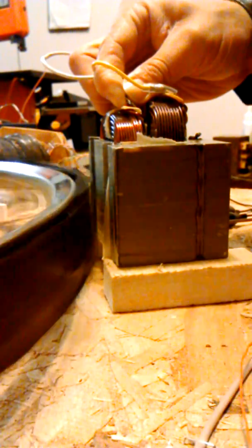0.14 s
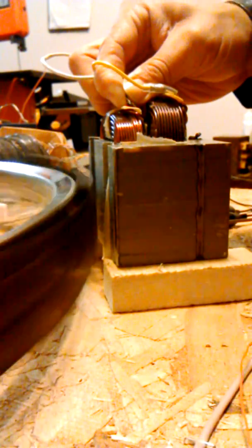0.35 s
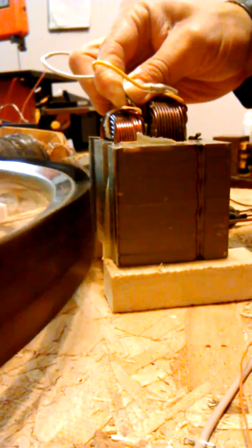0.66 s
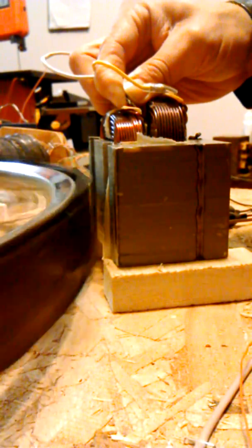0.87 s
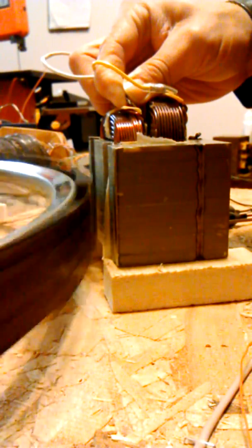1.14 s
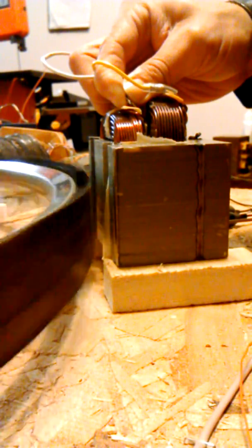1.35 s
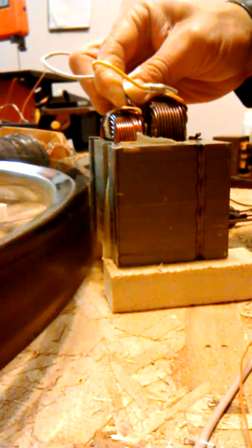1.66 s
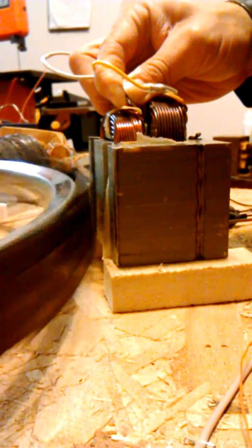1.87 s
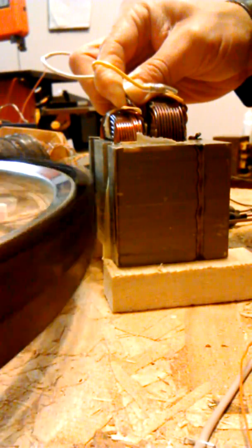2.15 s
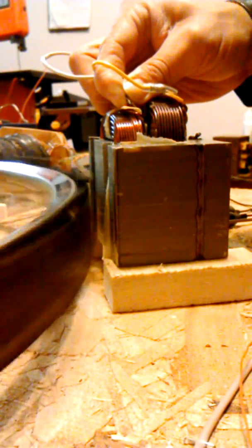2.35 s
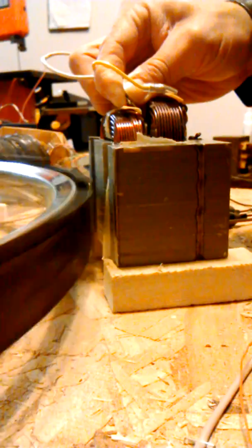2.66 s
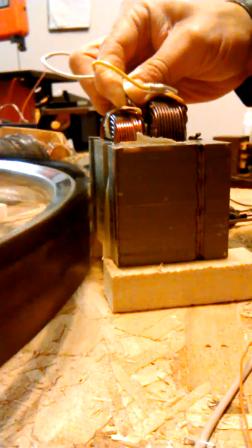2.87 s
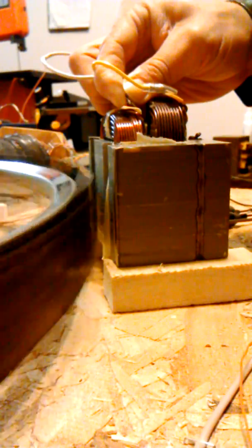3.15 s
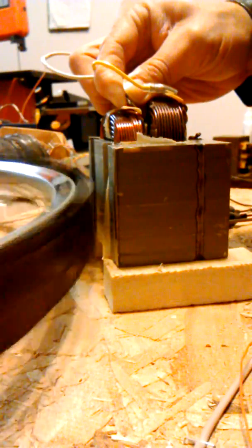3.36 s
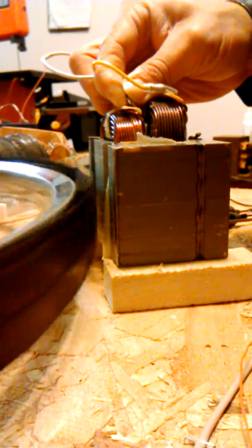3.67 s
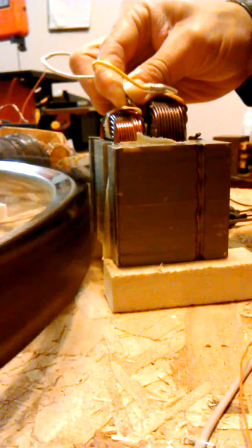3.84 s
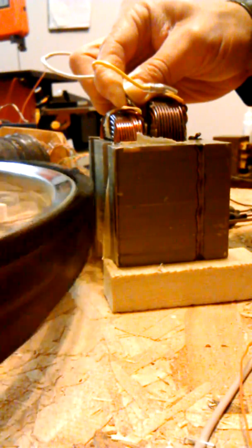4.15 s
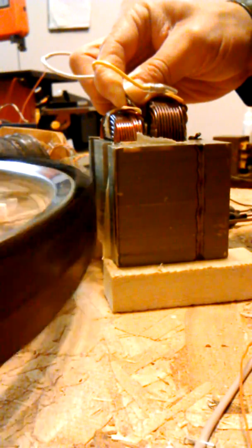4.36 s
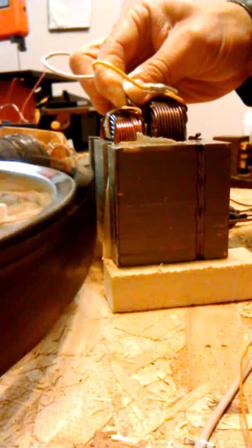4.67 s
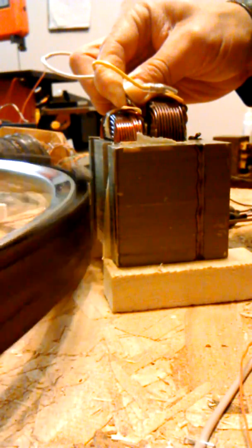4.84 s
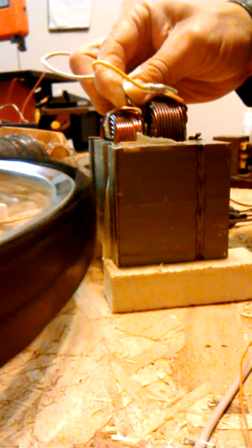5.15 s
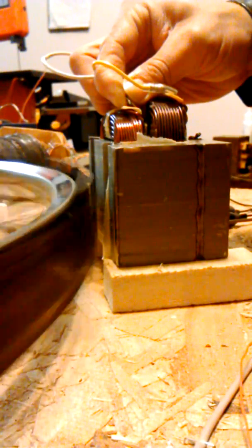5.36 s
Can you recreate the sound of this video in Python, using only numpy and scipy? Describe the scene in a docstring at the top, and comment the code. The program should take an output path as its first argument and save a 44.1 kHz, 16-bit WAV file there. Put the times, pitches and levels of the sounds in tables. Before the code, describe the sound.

Light, uneven knocks and taps from a loose part sound over the low, wavering rumble of a coasting wheel in a small workshop.

```python
"""A wheel carrying magnets coasts past hand-held, iron-cored coils on a wooden workbench.
From the start each magnet tugs at the bench and the bearing rumbles, over a faint hiss. A wire rubs,
then a loose part begins to knock unevenly, and the small workshop echoes it. Soon an iron core rings,
the board booms and wire ends click; taps, squeaks and scuffs follow. These sounds keep coming back
while the wheel slows a little."""
import sys
import numpy as np
from scipy import signal
from scipy.fft import rfft, irfft
from scipy.io import wavfile
from scipy.ndimage import uniform_filter1d

SR = 44100
rng = np.random.default_rng(int(sys.argv[2]) if len(sys.argv) > 2 else 0)


def unload_audio(sound):
    """Save the sound as a 16-bit wav file, at the path given as the first command line argument."""
    columns = np.transpose(np.atleast_2d(sound))
    # keep every value between -1 and 1, then stretch to whole-number steps
    steps = np.round(np.clip(columns, -1, 1) * 32767)
    wavfile.write(sys.argv[1], SR, steps.astype(np.int16))


N = 242991
TIME = np.arange(N) / SR

# The loose part knocks and settles into place. Hardness is how much treble a blow has.
# start_s, strength_db, hardness_db, hollow_tone_db, settle_s
KNOCKS = [(0.0588, -53.5, -7, -54.5, 0.0075), (0.1676, -44.5, -11, -50, 0.0083),
          (0.2612, -48, -3.5, -42.5, 0.0027), (0.5781, -49, -9.5, -55.5, 0.0073),
          (0.8276, -53.5, -3, -54, 0.0025), (1.1672, -58, 1.5, -52, 0.0045),
          (1.2514, -56.5, -7, -53, 0.008), (1.4018, -43.5, -25, -58, 0.0062),
          (1.557, -45.5, -11, -50.5, 0.0053), (1.7533, -46.5, -3.5, -52, 0.0087),
          (1.8853, -46.5, -1.5, -44.5, 0.0029), (2.0128, -42, 0, -43.5, 0.0083),
          (2.282, -41, -12.5, -49, 0.0041), (2.4205, -49.5, -12.5, -52.5, 0.008),
          (2.532, -53.5, -5.5, -51, 0.0046), (2.818, -42.5, -15, -51.5, 0.0076),
          (3.278, -47.5, -12, -60.5, .012), (3.325, -62, -7, -50, 0.0046), (3.374, -49, -5.5, -52, 0.0032),
          (3.4668, -47.5, -0.5, -42.5, 0.0024), (3.723, -43, 0.5, -43.5, 0.0065),
          (4.0191, -48.5, -7, -46.5, 0.0074), (4.1634, -53, -15, -48.5, 0.0058),
          (4.365, -46, 4.5, -40, 0.0049), (4.539, -54, -4, -50.5, 0.0046), (4.617, -45, -8, -53.5, 0.0109),
          (4.8765, -43.5, -12.5, -46.5, 0.0054), (5.0802, -48.5, -3.5, -45, 0.0031),
          (5.133, -46, -10.5, -50.5, 0.0084), (5.311, -48.5, -5.5, -47.5, 0.0062),
          (5.4168, -53, 1.5, -55.5, 0.0068)]
# The loose part taps without settling: start_s, strength_db, hardness_db
TAPS = [(0.383, -62.5, 9.5), (.396, -51.5, -11), (0.499, -48.5, -11.5), (0.613, -50, -15.5),
        (0.739, -48, -10), (0.928, -63, 5.5), (1.275, -46, -18), (1.426, -50.5, -5), (1.458, -51, -12),
        (1.634, -49, -13.5), (2.0169, -41, -3), (2.6, -52.5, -6), (2.676, -47.5, -4.5), (2.706, -47.5, -13),
        (2.968, -53, -7.5), (3.116, -61.5, -2.5), (3.158, -45, -15), (3.205, -50, -15), (3.505, -47.5, -11),
        (3.547, -53, -10), (3.815, -52, -8), (3.928, -51, -8), (4.009, -60, -4), (4.282, -55, -11.5),
        (4.532, -62.5, 6.5), (4.548, -49, -19), (4.707, -59, 2), (4.731, -53, -9), (4.797, -44.5, -14.5)]


def from_db(db):
    """Turn decibels into a number to multiply by."""
    return 10 ** (np.asarray(db) / 20)


def in_time(rows):
    """Join points in time with straight lines, giving one curve per column of values."""
    times, *columns = np.transpose(rows)
    return [np.interp(TIME, times, column) for column in columns]


def noise(colour):
    """Noise with a power of one. Its colour says how strong each pitch is: pitch_hz, level_db."""
    hz, db = np.transpose(colour)
    bins_hz = np.maximum(np.fft.rfftfreq(N, 1 / SR), 1)
    gain = from_db(np.interp(np.log(bins_hz), np.log(hz), db))
    shaped = irfft(rfft(rng.standard_normal(N)) * gain, N)
    return shaped / np.sqrt(np.mean(shaped ** 2) + 1e-20)


def evened(x, span_s):
    """Take the slow swells out of a noise."""
    return x / np.sqrt(uniform_filter1d(x ** 2, max(int(span_s * SR), 1)) + 1e-9)


def fade(t, ring_s):
    """Die away, falling 60 dB in ring_s seconds."""
    return np.exp(-np.log(1000) * t / ring_s)


def add(track, start_s, sound):
    """Mix a sound into the track from start_s on."""
    start = max(int(start_s * SR), 0)
    track[start:start + len(sound)] += sound[:N - start]


def ring(tones, hits, scatter_db, spread_s):
    """Start an object's own tones at each (start_s, level_db), with slightly random force and delay."""
    out = np.zeros(N)
    start_s, db = np.transpose(hits)
    chance = rng.standard_normal((len(start_s), len(tones), 2))
    for k, (hz, tone_db, ring_s) in enumerate(tones):
        hit_s = start_s + spread_s * np.abs(chance[:, k, 0])
        hit_samples = np.clip((hit_s * SR).astype(int), 0, N - 1)
        strength = from_db(db + tone_db + scatter_db * chance[:, k, 1])
        force = np.bincount(hit_samples, strength, N) * (-1) ** k
        # this filter turns each push into a fading sine wave
        decay, step = fade(1 / SR, ring_s), 2 * np.pi * hz / SR
        out += signal.lfilter([0, np.sin(step)], [1, -2 * decay * np.cos(step), decay ** 2], force + 1e-18)
    return out


def magnets(waver_db, fade_db_per_s):
    """Each passing magnet tugs the bench. The tugs waver because the magnets are not quite alike."""
    # the wheel slows: time_s, magnets_per_s
    wheel_speed = [(0, 21.56), (2.75, 20.58), (5.51, 19.5)]
    # the tones in the tug: multiple_of_passing_rate, level_db
    tug_tones = [(1, -45), (2, -58.5), (3, -56.5), (4, -62), (5, -54.5)]
    magnets_per_s, = in_time(wheel_speed)
    phase = 2 * np.pi * np.cumsum(magnets_per_s) / SR
    waver = from_db(waver_db * noise([(1, 25), (4, -4), (12, -27), (60, -100)]))
    tug = np.zeros(N)
    for multiple, db in tug_tones:
        level = from_db(db - multiple * fade_db_per_s * TIME)   # higher tones weaken faster
        tug += level * np.sin(multiple * phase + 2 * np.pi * rng.random())
    return np.sqrt(2) * waver * tug


def bearing(swell_db):
    """The rolling bearing shakes the board in random swells, over a steady drone and a thin whirr."""
    # strength of the rumble: time_s, low_db, high_db
    rumble_levels = [(0.0, -59, -58), (0.12, -52, -53), (1.99, -53, -50.5), (2.27, -54, -57),
                     (2.38, -52, -52.5), (5.19, -52.5, -55), (5.48, -64.5, -57), (5.51, -62, -49)]
    # colours of the board's low and high rumble, the drone and the whirr: pitch_hz, level_db
    board_low = [(60, -20), (88, -17.5), (102, -4), (112, -6), (122, -1.5), (136, -4), (150, -14),
                 (175, -20.5), (300, -58.5)]
    board_high = [(110, -53), (145, -5.5), (158, 0.5), (175, 3), (185, -3), (196, 3), (216, 0), (235, -15),
                  (300, -57.5), (600, -100)]
    drone = [(8, -2.5), (30, 0), (42, 0.5), (52, -1), (62, 4.5), (80, -4), (140, 1), (245, -4.5), (285, -6),
             (325, -3), (370, -10), (410, -26), (600, -26), (1500, -80)]
    whirr = [(240, -45), (400, 3), (450, 2.5), (481, 4.5), (510, -3.5), (562, -0.5), (610, -9), (690, 0.5),
             (722, 2), (760, -6.5), (801, 6.5), (825, -9), (895, -2.5), (935, 0), (990, -4.5), (1065, 5.5),
             (1130, -12.5), (1174, -12), (1215, -12), (1280, -4.5), (1450, -8.5), (1800, -8.5), (2160, -7),
             (2520, -13), (3500, -22.5), (4550, -63), (7700, -110)]
    swells = [(1, 5), (5, 1), (10, -5), (30, -47), (100, -100)]
    low_db, high_db = [db + swell_db * noise(swells) for db in in_time(rumble_levels)]
    low = from_db(low_db - 1) * evened(noise(board_low), span_s=0.061)
    high = from_db(high_db) * evened(noise(board_high), span_s=0.11)
    return low + high + from_db(-54.5) * noise(drone) + from_db(-66) * noise(whirr)


def hiss():
    """A faint, steady hiss lies behind everything."""
    # colour of the hiss: pitch_hz, level_db
    colour = [(300, -1.7), (3000, -0.09), (4300, 2), (5500, 0.11), (9000, -0.31), (11500, -1.1),
              (14000, 0.22), (16000, 0.16)]
    return from_db(-73) * noise(colour)


def wire_rubs():
    """A wire slides with a thin, short rasp."""
    # each slide: start_s, length_s, level_db
    rubs = [(0.0, 0.053, -67), (0.17, .025, -78), (0.258, 0.031, -68)]
    # colour of the rasp: pitch_hz, level_db
    colour = [(2000, -5), (3500, -7), (4400, -6), (5200, -17), (9000, -14), (15000, -38)]
    level = sum(from_db(db) * np.sin(np.pi * np.clip((TIME - start_s) / length_s, 0, 1))
                for start_s, length_s, db in rubs)
    return level * noise(colour)


def thuds(slips):
    """Knocks, taps and slips shake the wooden mount, which rings low and briefly."""
    # the mount's own tones: pitch_hz, level_db, ring_s
    wood_tones = [(482, -13, .06), (650, -5, .02), (722, -3, .04), (802, -7, .04), (895, -8, .045),
                  (935, -6, .045), (1174, -9, .05), (1280, -6, .06)]
    knocks = [(start_s, db - 0.5) for start_s, db, *_ in KNOCKS]
    taps = [(start_s, db + 7) for start_s, db, _ in TAPS]
    return from_db(-9) * ring(wood_tones, knocks + taps + slips, scatter_db=2.5, spread_s=0.0018)


def hollow_tones(start_hz, top_hz, attack_s):
    """The contact stiffens as the loose part settles, so its tone slides up through a hollow ring."""
    hollow_hz, width_hz, wall_delay_s = 1059, 45, 0.0094
    slides, t = np.zeros(N), TIME[:SR // 12]
    for start_s, _, _, db, settle_s in KNOCKS:
        tuning = 1 + 0.03 * rng.standard_normal()
        hz = (top_hz + (start_hz - top_hz) * np.exp(-t / settle_s)) * tuning
        length_s = 0.0031 + 1.05 * settle_s
        swell = (1 - np.exp(-t / attack_s)) * np.exp(-(t / length_s) ** 2)
        add(slides, start_s, from_db(db - 0.5) * swell * np.sin(2 * np.pi * np.cumsum(hz) / SR))
    hollow = signal.iirpeak(hollow_hz, hollow_hz / width_hz, fs=SR)
    tone = slides + from_db(10.5) * signal.lfilter(*hollow, slides + 1e-18)
    wall_echo = from_db(-15) * np.interp(TIME - wall_delay_s, TIME, tone)
    return tone + wall_echo


def clacks(slips):
    """Hard hits and slips make the loose part clack and set the wheel's rim singing."""
    # the own tones of the loose part and of the rim: pitch_hz, level_db, ring_s
    part_tones = [(580, -4.5, 0.01), (1570, -0.5, 0.018), (2037, 0.5, 0.021), (2119, -6.5, 0.04),
                  (2233, -2, 0.023), (2460, -13, 0.023), (2820, -12, 0.028), (3050, -34, 0.036),
                  (3220, -20, 0.032), (3620, -27, 0.018), (4360, -23, 0.026), (4720, -21, 0.015),
                  (6050, -32, 0.0071)]
    rim_tones = [(560, -29, .6), (803, -26, .7), (846, -28, .6), (1174, -19, .22), (1260, -21, .3),
                 (1632, -20, .35), (1688, -21, .35), (1782, -23, .7), (1805, -25, .7), (1823, -22.5, .75),
                 (1856, -23, .55), (2125, -17, .2), (2252, -18, .2), (2455, -24, .25), (2686, -29, .3),
                 (3090, -31, .3), (3250, -33, .3)]
    knocks = [(start_s, db + hardness_db - 0.2) for start_s, db, hardness_db, *_ in KNOCKS]
    hits = knocks + scrapes(count=4, drag_s=0.009) + slips
    clack = ring(part_tones, hits, scatter_db=2.8, spread_s=0.0018)
    rim = ring(rim_tones, hits, scatter_db=1.5, spread_s=0.003)
    return from_db(2.5) * clack, from_db(3.5) * rim


def mount_gaps(sound):
    """Between its groups of tones the mount gives off hardly any sound."""
    for hz, width_hz in [(1460, 120), (998, 30), (2370, 40)]:
        sound = signal.lfilter(*signal.iirnotch(hz, hz / width_hz, fs=SR), sound)
    return sound


def workshop(sound, colour, build_s, ring_s=0.39):
    """The room stores a sound's energy and lets it die away as a wash of noise."""
    keep, build = fade(1 / SR, ring_s) ** 2, np.exp(-1 / (build_s * SR))
    stored = signal.lfilter([1 - keep], [1, -keep], sound ** 2 + 1e-18)
    smoothed = signal.lfilter([1 - build], [1, -build], stored)
    return np.sqrt(smoothed) * noise(colour)


def clinks():
    """An iron core rings. A dull ring is mostly its two lowest tones, which throb together."""
    # moments when the core's ring sounds or throbs up again: start_s, level_db, brightness_db_per_octave
    moments = [(0.258, -55, -20), (1.757, -56, -21), (2.015, -49.5, 10), (2.044, -46, -22),
               (2.061, -48.5, -22), (2.284, -58, -17), (2.676, -50.5, -23), (4.367, -58, 8)]
    # the core's own tones: pitch_hz, level_db, ring_s
    core_tones = [(1633, -4, .22), (1685, -5, .2), (2037, 0, .14), (2255, -3, .11), (2525, -7, .07),
                  (3130, -24, .25), (3330, -16, .06), (4230, -16, .04)]
    out, lowest_hz = np.zeros(N), core_tones[0][0]
    for start_s, db, brightness in moments:
        tones = [(hz, tone_db + brightness * np.log2(hz / lowest_hz), ring_s)
                 for hz, tone_db, ring_s in core_tones]
        out += ring(tones, [(start_s, db)], scatter_db=0.8, spread_s=0.002)
    return out


def booms(boost_db, half_length_s):
    """The board swells on one of its own low tones for a few swings."""
    # each boom: middle_s, pitch_hz, level_db
    board_booms = [(.274, 155.2, -43), (.439, 200, -51), (.449, 115, -46), (0.697, 114.3, -43.5),
                   (2.015, 128.7, -48.5), (2.544, 108, -45), (2.733, 111, -43.5), (3.402, 169.3, -41),
                   (3.567, 191, -41), (3.791, 105.9, -48), (4.606, 115.9, -42.5), (4.809, 186, -45),
                   (5.048, 131, -42.5), (5.149, 183.7, -45.5)]
    out = np.zeros(N)
    for middle_s, hz, db in board_booms:
        swell = np.exp(-((TIME - middle_s) / half_length_s) ** 2)
        out += from_db(db + boost_db) * swell * np.sin(2 * np.pi * (hz * TIME + rng.random()))
    return out


def wire_clicks(ring_s):
    """Wire ends touch with a tiny dry click, some brighter than others."""
    # each touch: start_s, level_db, brightness_db_per_octave
    clicks = [(0.374, -62, -4), (1.1354, -69, 0), (1.854, -70, -2), (1.8966, -63, 5), (2.576, -61, -1),
              (3.305, -59, -1), (4.047, -61.5, 1), (4.095, -67, 0), (5.1547, -66, 2)]
    # colour of a click: pitch_hz, level_db
    colour = [(1500, -3), (4000, 0), (5200, -10), (6800, 6.5), (7900, -3.5), (9500, 3.5), (11500, -12),
              (15000, 1)]
    out, t = np.zeros(N), TIME[:SR // 10]
    for start_s, db, brightness in clicks:
        tilted = [(hz, level_db + brightness * np.log2(hz)) for hz, level_db in colour]
        add(out, start_s, from_db(db) * fade(t, ring_s) * noise(tilted)[:len(t)])
    return out


def scrapes(count, drag_s):
    """A tap drags, sharing its treble among several tiny hits: start_s, level_db."""
    share_db = 0.7 - 10 * np.log10(count)
    return [(start_s + drag_s * (k + jitter) / count, db + hardness_db + share_db)
            for start_s, db, hardness_db in TAPS for k, jitter in enumerate(rng.random(count))]


def squeaks(octave_db, roughness):
    """The mount sticks and slips unevenly, making a short tone with a weak one an octave above."""
    # each squeak: start_s, pitch_hz, length_s, level_db
    mount_squeaks = [(0.515, 1277, 0.035, -57.5), (.748, 1260, 0.067, -63), (0.972, 715, 0.023, -52.5),
                     (1.262, 720, 0.021, -57), (1.459, 1300, 0.015, -54.5), (2.434, 1275, 0.022, -60),
                     (2.604, 920, 0.048, -57.5), (4.546, 1272, 0.032, -49.5), (4.552, 880, 0.023, -49.5),
                     (4.797, 1310, 0.018, -50), (5.155, 1295, 0.019, -49.5), (5.333, 1200, .02, -58),
                     (5.434, 1314, 0.015, -52.5)]
    out, t = np.zeros(N), TIME[:SR // 10]
    unevenness = noise([(30, -2), (200, 5), (600, -36), (3000, -90)])
    for start_s, hz, length_s, db in mount_squeaks:
        swell = np.sin(np.pi * np.minimum(t / length_s, 1))
        phase = 2 * np.pi * hz * t + roughness * np.interp(start_s + t, TIME, unevenness)
        tone = np.sin(phase) + from_db(octave_db) * np.sin(2 * phase)
        add(out, start_s, from_db(db) * swell * tone)
    return out


def scuff_slips(count):
    """A scuff is a run of tiny slips (start_s, level_db), strongest in its middle."""
    # the loose part scuffs: start_s, length_s, slip_db
    scuffs = [(0.724, 0.033, -64), (.965, 0.051, -82), (1.416, 0.05, -78), (2.149, 0.028, -64.5),
              (2.584, 0.051, -65.5), (3.154, 0.076, -72), (3.374, 0.056, -77), (4.533, 0.04, -63),
              (4.763, 0.055, -65), (5.133, 0.031, -69)]
    return [(start_s + length_s * progress, db + 20 * np.log10(np.sin(np.pi * progress) + 1e-3))
            for start_s, length_s, db in scuffs for progress in rng.random(count)]


def scene():
    """Knocks echo in the room over the rumble of the wheel."""
    # colours of the room's echo of the duller sounds and of the clack: pitch_hz, level_db
    dull_echo = [(250, -36), (480, -1), (600, -9), (715, 4.5), (760, -17), (802, -7), (865, -34),
                 (930, 2.5), (1000, -11.5), (1062, 8.5), (1120, -1.5), (1174, 0), (1215, -2.5), (1280, 3.5),
                 (1450, -15), (3000, -51)]
    clack_echo = [(300, -34), (500, -10.5), (1000, -40), (1450, -14), (1660, -4), (1820, -2.5), (1950, 1),
                  (2100, -2.5), (2350, 0.5), (2500, 3), (2740, 0), (2890, -14), (3130, -2), (3480, -11),
                  (3800, -11.5), (4300, -16), (5500, -23.5), (12000, -36)]
    slips = scuff_slips(count=20)
    dull = thuds(slips) + hollow_tones(start_hz=475, top_hz=1338, attack_s=0.0017)
    dull += squeaks(octave_db=-22, roughness=0.22)
    clack, rim = clacks(slips)
    direct = mount_gaps(dull + clack + rim + clinks())
    room = from_db(-5) * workshop(dull, dull_echo, build_s=0.0006)
    room += from_db(-8.5) * workshop(clack, clack_echo, build_s=0.003)
    wheel = magnets(waver_db=2.57, fade_db_per_s=0.36) + bearing(swell_db=2)
    wheel += booms(boost_db=3, half_length_s=0.019)
    wires = wire_clicks(ring_s=0.064) + wire_rubs()
    return (direct + room + wheel + wires + hiss())[None]


def record(dry):
    """The very highest treble is cut off steeply."""
    cutoff_hz = 15400
    return signal.sosfilt(signal.ellip(10, 0.1, 70, cutoff_hz, fs=SR, output="sos"), dry)


dry = scene()
out = record(dry)
unload_audio(out)
```